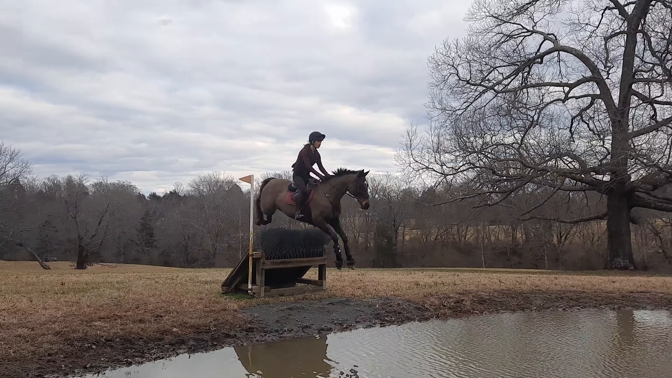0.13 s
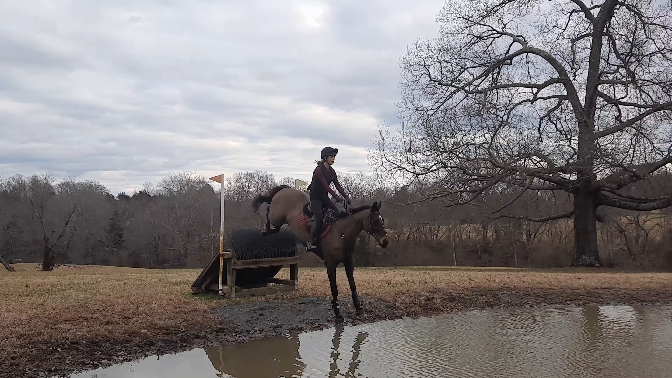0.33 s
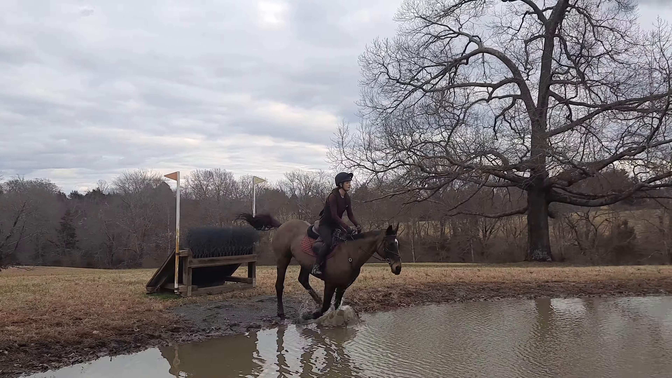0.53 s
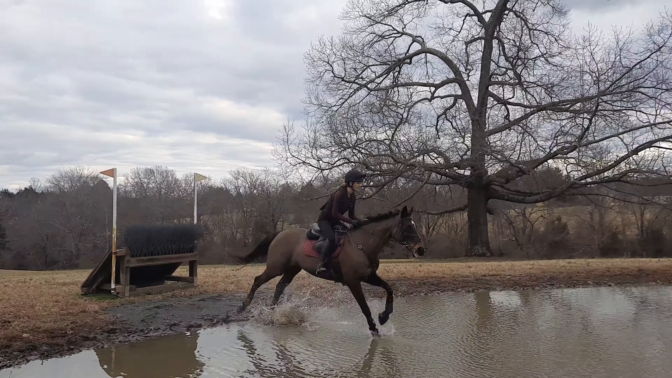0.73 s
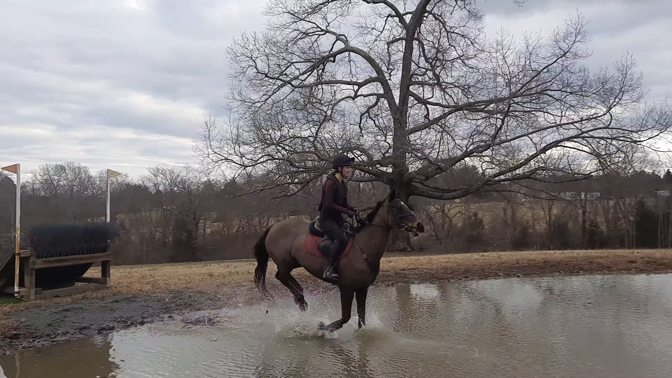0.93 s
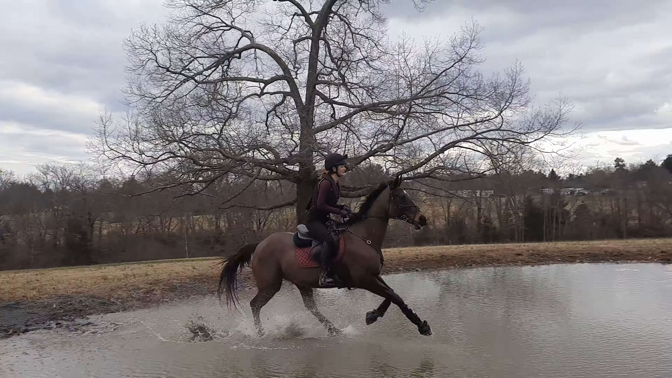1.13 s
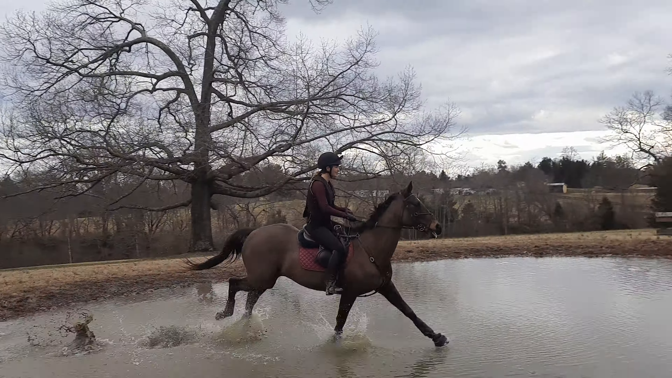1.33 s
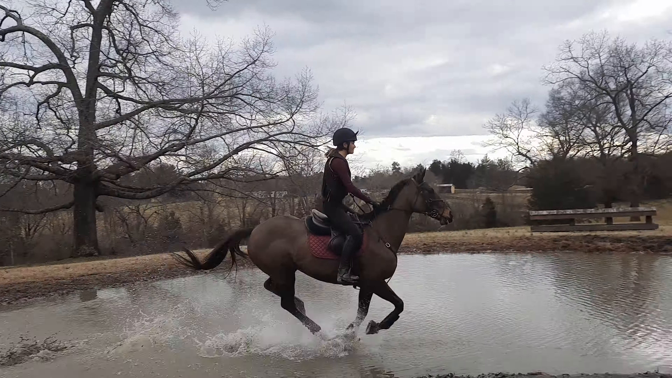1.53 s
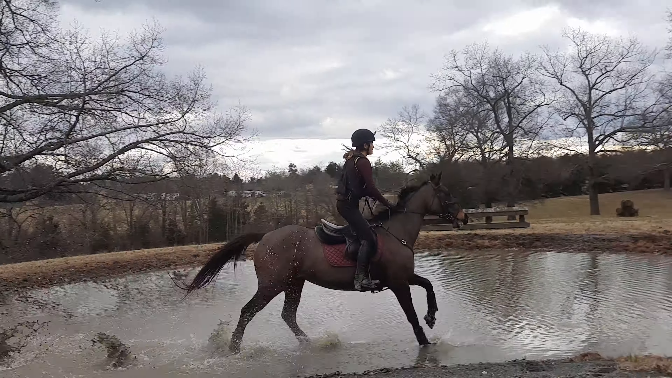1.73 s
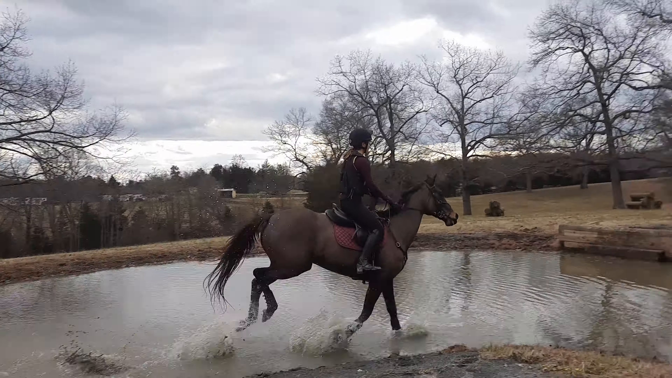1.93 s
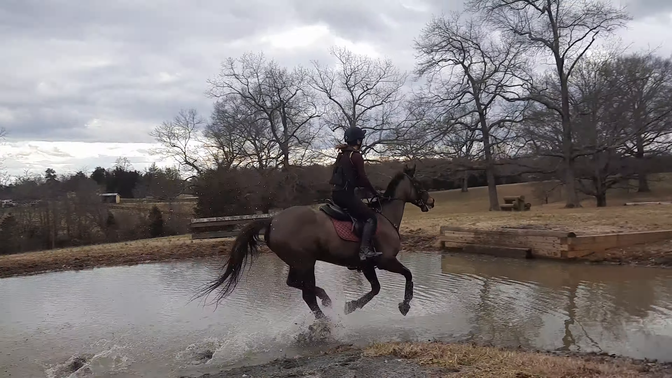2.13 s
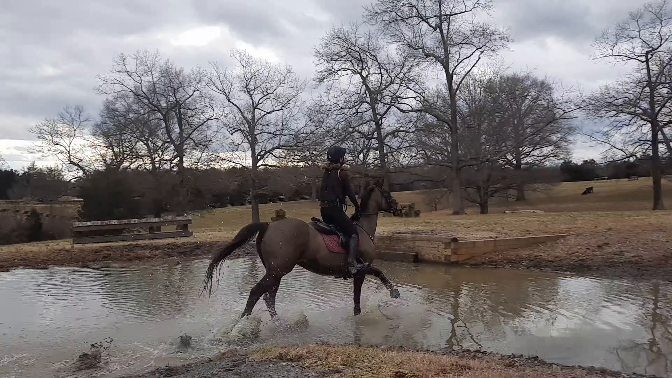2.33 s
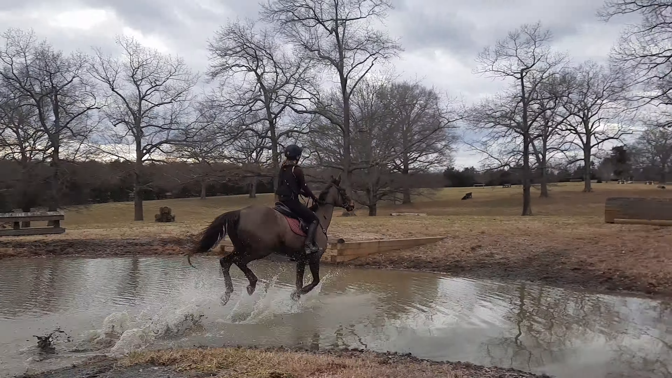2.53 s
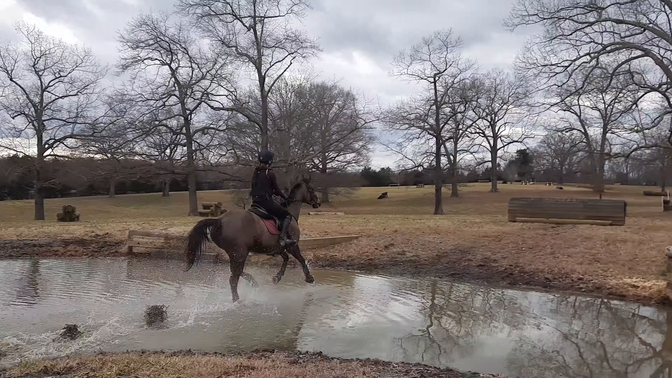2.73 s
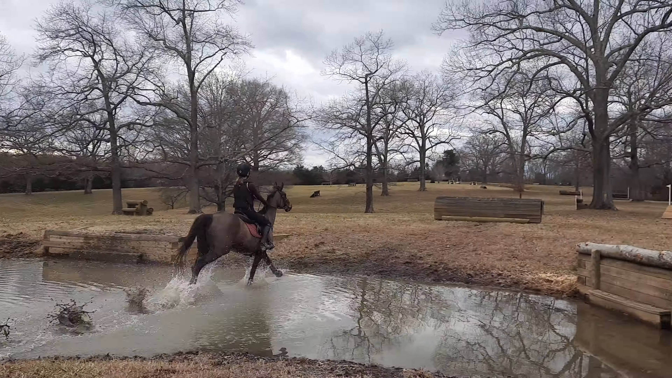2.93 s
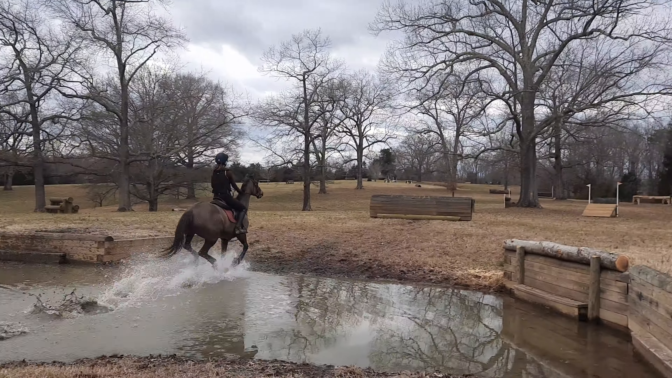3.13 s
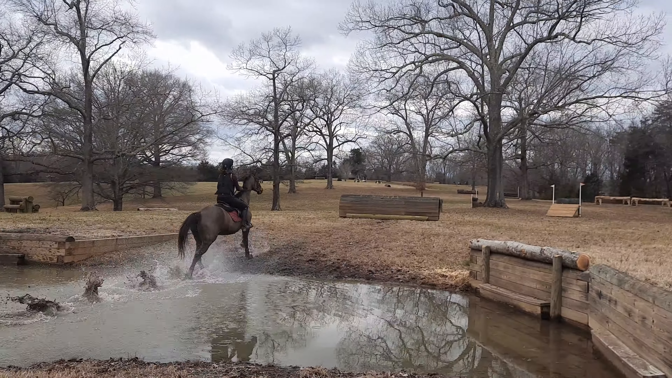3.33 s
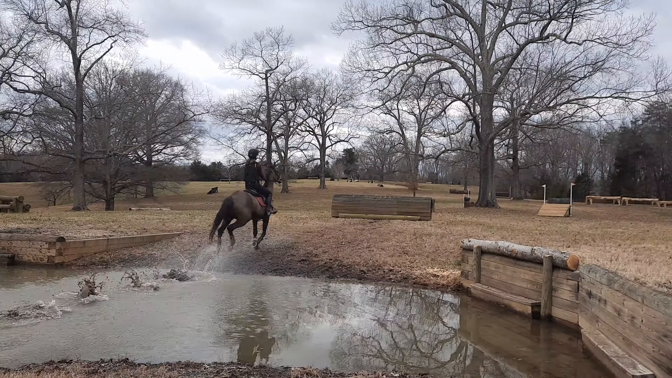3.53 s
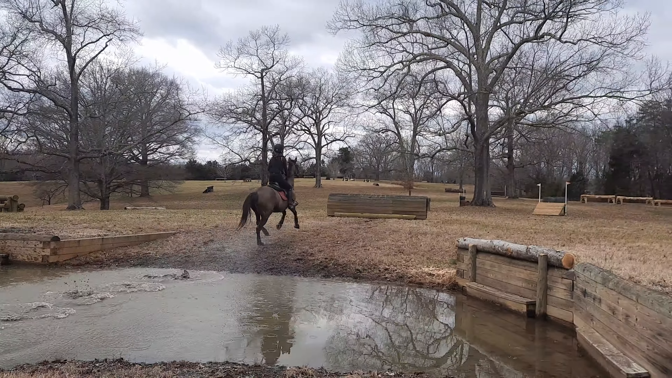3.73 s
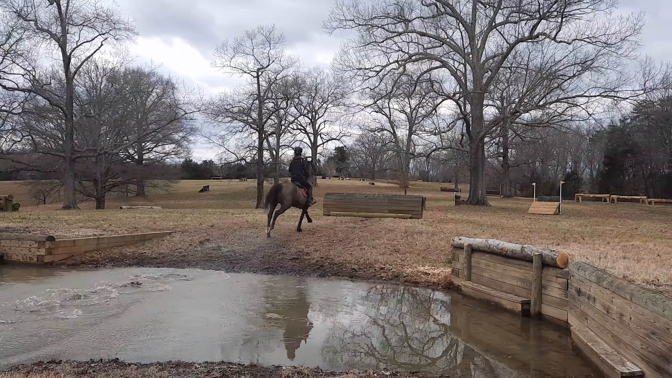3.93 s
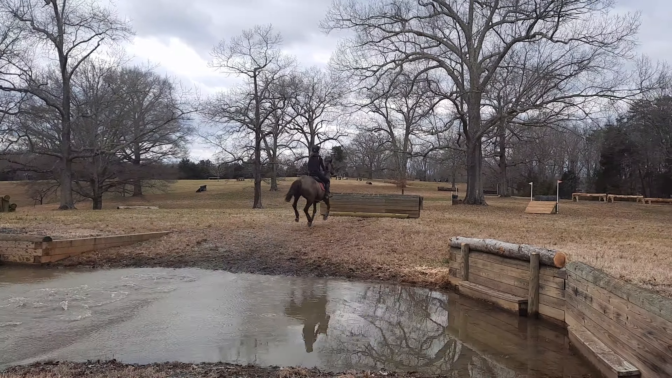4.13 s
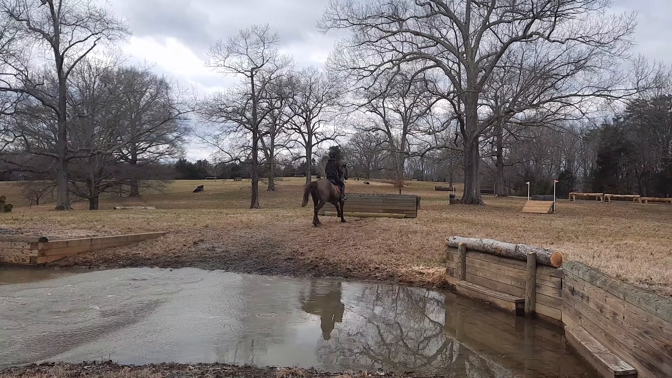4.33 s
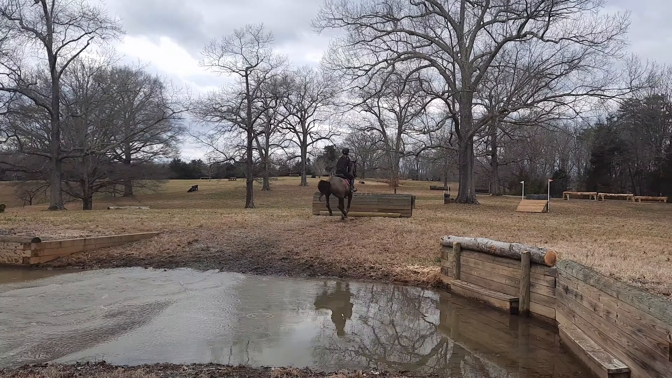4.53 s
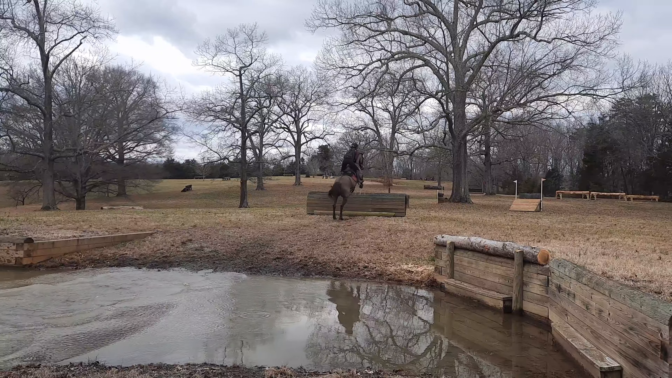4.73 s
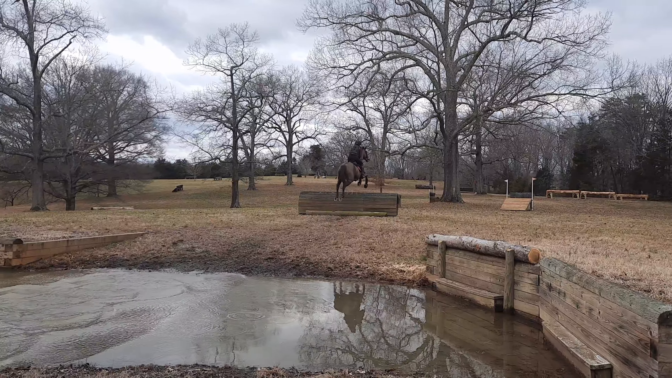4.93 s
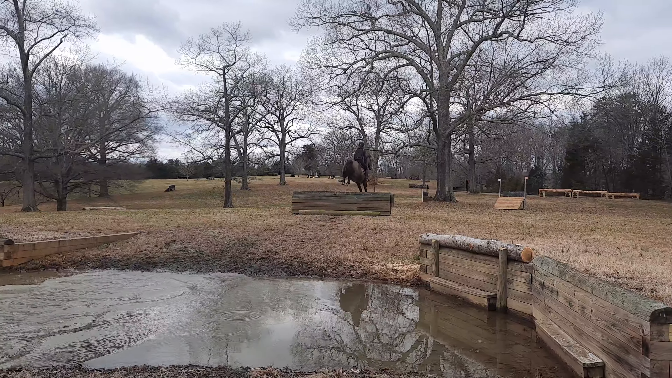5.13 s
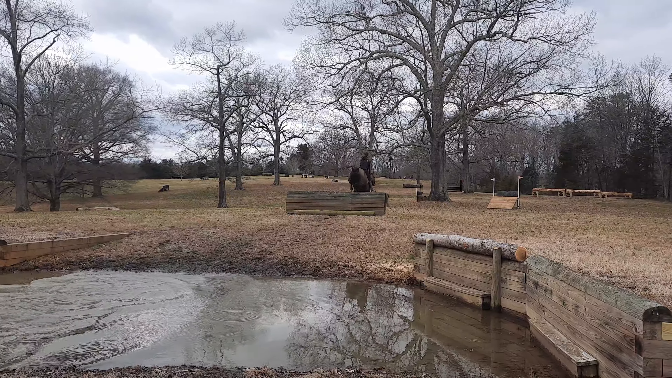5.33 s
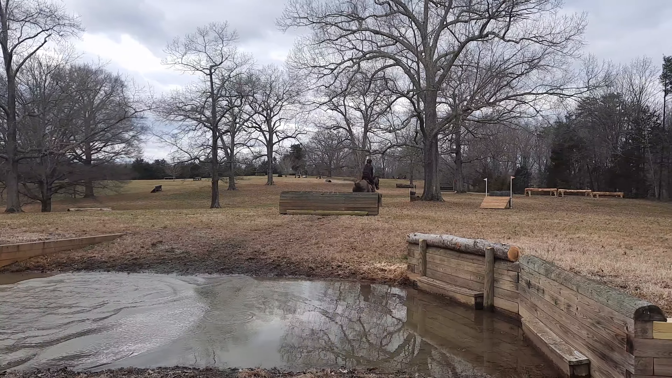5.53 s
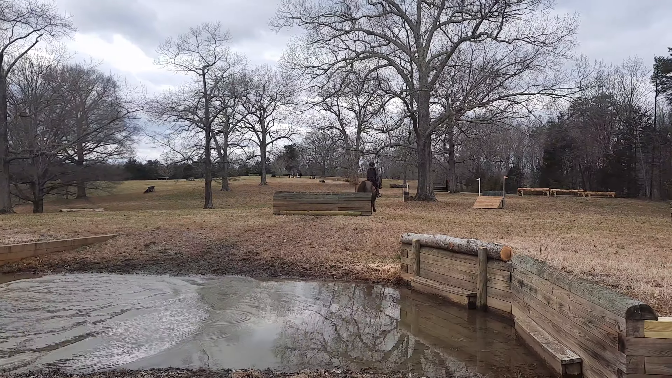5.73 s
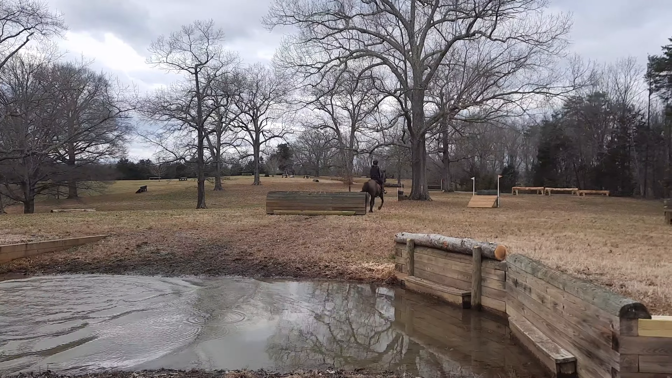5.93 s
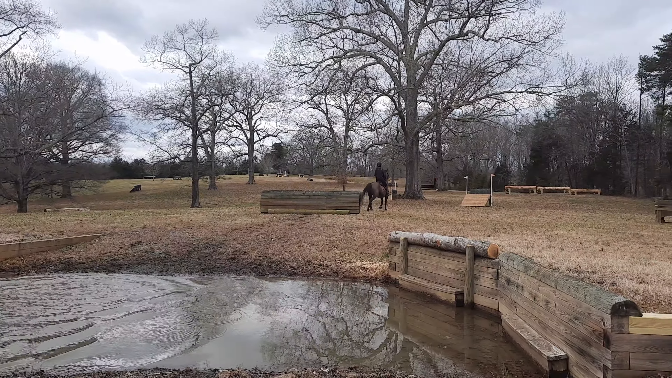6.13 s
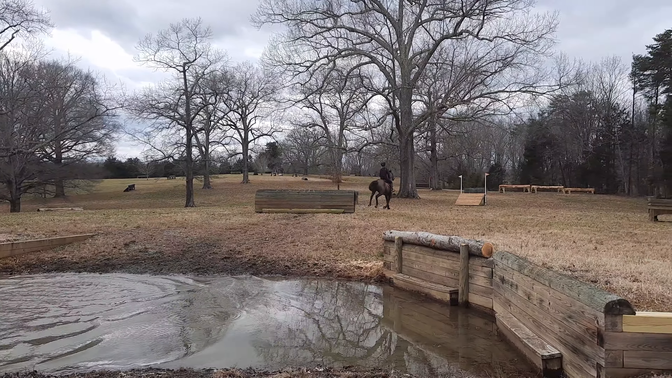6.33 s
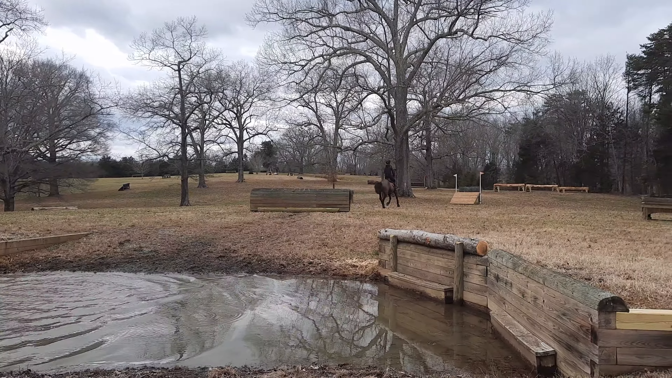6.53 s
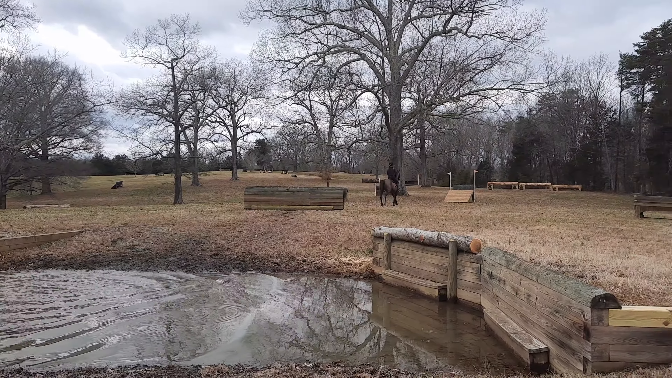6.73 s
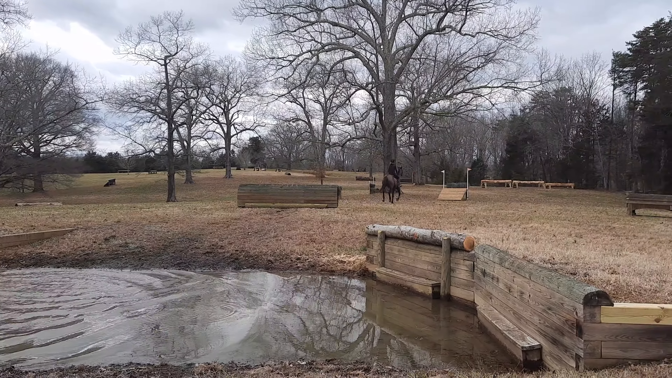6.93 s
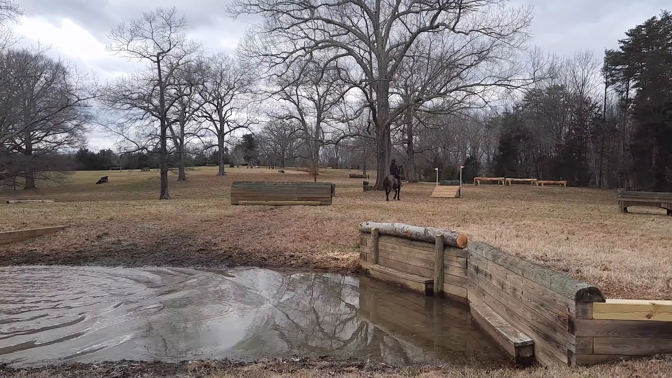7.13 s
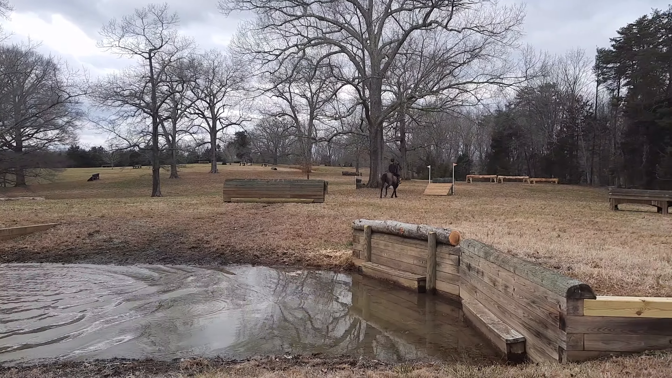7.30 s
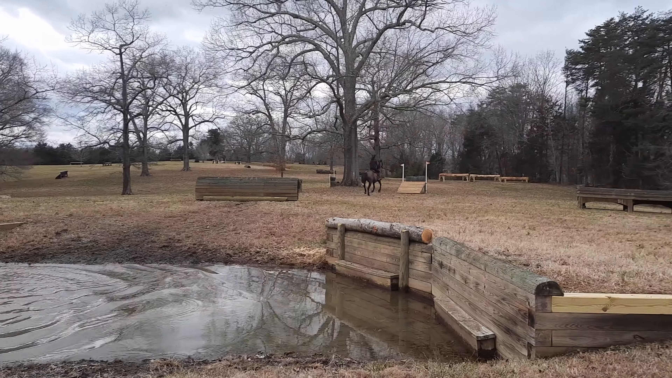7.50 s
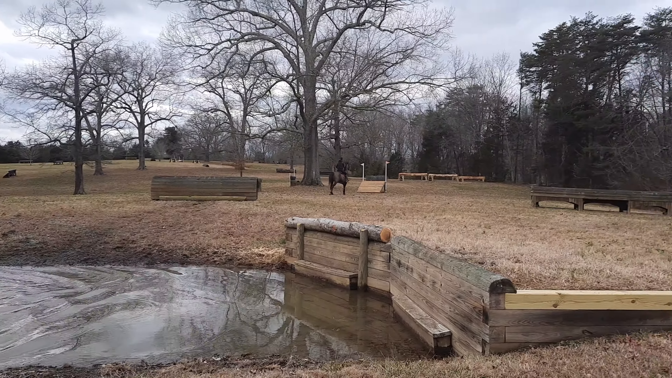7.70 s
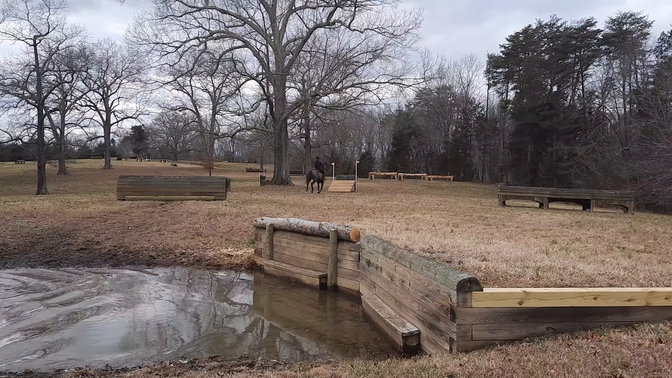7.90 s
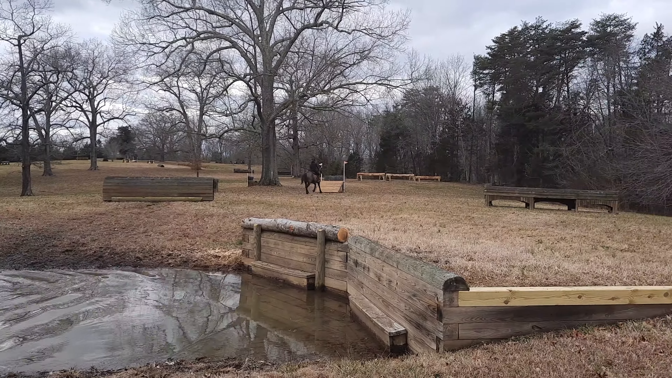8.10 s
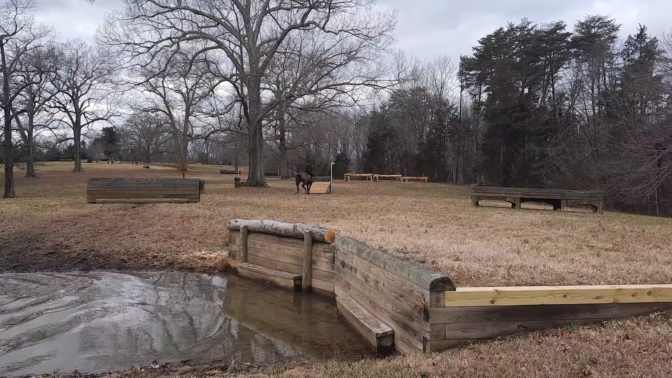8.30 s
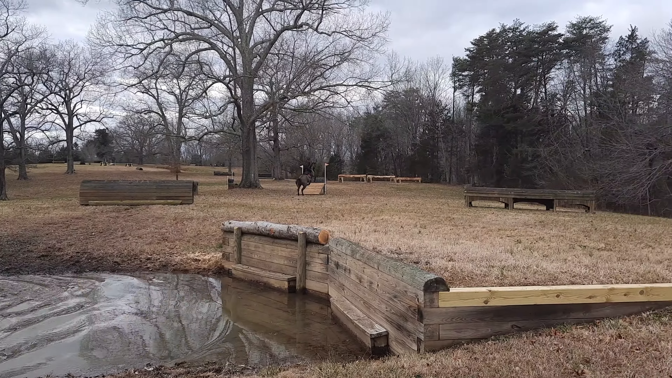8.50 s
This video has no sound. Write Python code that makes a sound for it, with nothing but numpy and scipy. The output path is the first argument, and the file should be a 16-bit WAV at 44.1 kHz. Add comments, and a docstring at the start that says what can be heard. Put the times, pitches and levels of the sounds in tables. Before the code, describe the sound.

A horse plunges into a shallow pond and canters through with heavy slaps and hissing spray, then thuds away over turf into windy quiet.

```python
"""Heavy plunges, sharp slaps and hissing spray: a horse canters through a shallow pond past the microphone.
Each hoof drives an air pocket under (sinking sine swings), slaps the surface and throws up a sheet of water
(shaped noise) that falls back as drops and bubbles (impact trains, short rising sines).
Ashore, dull thuds and grit draw away over turf, with a last cluster at a far fence.
Behind: scuffs, rustling cloth, a far bird, still air and a breeze buffeting the two microphone ports."""
import sys
import numpy as np
from scipy import signal
from scipy.fft import rfft, irfft, next_fast_len
from scipy.io import wavfile
from scipy.ndimage import uniform_filter1d, map_coordinates

SR = 44100
rng = np.random.default_rng(int(sys.argv[2]) if len(sys.argv) > 2 else 0)


def bounce(signal):
    """Save signal as a 16-bit WAV file at the path given by the first command-line argument."""
    frames = np.transpose(np.atleast_2d(signal))
    limited = np.clip(frames, -1, 1)
    pcm = np.round(limited * 32767).astype(np.int16)
    wavfile.write(sys.argv[1], SR, pcm)


N = 381906
TIME = np.arange(N) / SR


def gain_of(db):
    """Decibels to amplitude."""
    return 10 ** (np.asarray(db) / 20)


def evened(x):
    """Scales to rms 1."""
    return x / np.sqrt(np.mean(x ** 2) + 1e-20)


def white():
    """Three unrelated white noises, the input of ports()."""
    return rng.standard_normal((3, N))


def filtered(x, order, edge_hz, kind="low"):
    """Butterworth filter."""
    return signal.sosfilt(signal.butter(order, edge_hz, kind, fs=SR, output="sos"), x)


def read_spectrum(points, hz):
    """Interpolates a table on a log-frequency axis."""
    f, value = np.transpose(points)
    return np.interp(np.log(hz + 1), np.log(f + 1), value)


def add(mix, start_s, sound):
    """Mixes a sound in at its start time."""
    part = mix[max(round(start_s * SR), 0):][:len(sound)]
    part += sound[:len(part)]


def swell(t, rise_s):
    """Grows to 1 in the rise time, then dies away."""
    u = np.maximum(t, 0) / rise_s
    return u * np.exp(1 - u)


def swell_time(rise_s):
    """Time axis long enough for one swell."""
    return np.arange(0, 10 * rise_s, 1 / SR)


def sagging_swing(t, hz, rise_s, sag):
    """A swelling sine that sinks in pitch from hz * (1 + sag) towards hz * (1 - sag)."""
    pitch_hz = hz * (1 + sag * (2 * np.exp(-t / (2 * rise_s)) - 1))
    turns = np.cumsum(pitch_hz) / SR
    return swell(t, rise_s) * np.sin(2 * np.pi * turns)


def bursts(rows):
    """Power sum of swells given as (time [s], level [dB], rise [s])."""
    power = np.zeros(N)
    for s, db, rise_s in rows:
        add(power, s, (gain_of(db) * swell(swell_time(rise_s), rise_s)) ** 2)
    return np.sqrt(power)


def ports(three, spectrum, likeness):
    """Colours three unrelated signals: one shared by both ports, one private to each."""
    size = next_fast_len(N)
    z, hz = rfft(three, size), np.fft.rfftfreq(size, 1 / SR)
    same = np.clip(read_spectrum(likeness, hz), 0, 1)
    pair = np.sqrt(same) * z[0] + np.sqrt(1 - same) * z[1:]
    coloured = pair * gain_of(read_spectrum(spectrum, hz))
    return evened(irfft(coloured, size)[:, :N])


def patter(per_s, spread_db, smooth):
    """Three trains of tiny impacts of uneven size over a blur of still finer ones."""
    size = gain_of(spread_db * np.minimum(rng.exponential(1, (3, N)), 4))
    sign = np.sign(rng.standard_normal((3, N)))
    struck = rng.random((3, N)) < per_s / SR
    return evened(size * sign * struck) + smooth * white()


def lumpy(x, span_s, span_hz, depth_db):
    """Breaks a wash into clumps that come and go, each in its own band."""
    _, _, z = signal.stft(x, nperseg=512, noverlap=384)
    field = rng.standard_normal(z.shape[1:])
    spans = [span_hz * 512 / SR, span_s * SR / 128]  # in bins, in frames
    reach = np.arange(-40, 41)
    for axis, span in enumerate(spans):
        bell = np.exp(-.5 * (reach / span) ** 2)
        field = signal.fftconvolve(field, np.expand_dims(bell, 1 - axis), "same", axes=axis)
    clumps = gain_of(depth_db * np.clip(evened(field), -2, 2))
    return evened(signal.istft(z * clumps, nperseg=512, noverlap=384)[1][:, :N])


def puff(noise, db, rise_s):
    """Cuts one swell of the given level from the start of a noise."""
    shape = swell(swell_time(rise_s), rise_s)[:noise.shape[-1]]
    rms = np.sqrt(np.mean(shape ** 2))
    return gain_of(db) * rms * evened(noise[..., :len(shape)] * shape)


def puffs(pair, rows):
    """Swells of a two-port noise at (time [s], level [dB], rise [s])."""
    out = np.zeros((2, N))
    for s, db, rise_s in rows:
        cut = puff(pair[:, round(s * SR):], db, rise_s)
        for port, sound in zip(out, cut):
            add(port, s, sound)
    return out


def spatter(rows, octaves, per_s, smooth):
    """Short clusters of sharp impacts at (time [s], level [dB], centre [Hz], rise [s])."""
    out, hits = np.zeros(N + SR), patter(per_s, spread_db=2, smooth=smooth)[0]
    for s, db, hz, rise_s in rows:
        edges_hz = np.minimum(hz * 2 ** (np.array([-.5, .5]) * octaves), .48 * SR)
        band = filtered(hits[round(s * SR):][:SR // 2], 2, edges_hz, "band")
        add(out, s, puff(band, db, rise_s))
    return out[:N]


# breeze before its trim: (time [s], level [dB])
BREEZE_LEVELS = [(5.6, -59), (6.298, -42.5), (6.398, -46.5), (6.7, -37), (6.75, -44), (6.792, -37.5),
                 (6.818, -53), (7.01, -43), (7.166, -48.5), (7.24, -61)]
# single gusts: (time [s], length [s], level [dB])
GUST_EVENTS = [(7.259, 0.15, -50), (7.51, 0.21, -54), (7.79, 0.14, -52.5), (7.989, 0.046, -63),
               (8.074, 0.03, -70), (8.154, 0.12, -61), (8.556, 0.11, -45)]
# air past the ports as the microphone swings round: (time [s], level [dB])
SWING_LEVELS = [(.4, -76), (1.5, -62), (3.2, -44.5), (3.7, -62), (4.6, -61), (5.05, -53.5), (5.3, -67.5),
                (5.9, -81)]
# relative spectra of buffeting and still air: (frequency [Hz], level [dB])
BUFFET_SPECTRUM = [(20, -17.5), (50, -1), (80, 4.5), (130, -7.5), (250, -20.5), (400, -35), (1000, -50.5),
                   (4000, -78)]
AIR_SPECTRUM = [(15, -33.5), (25, -9.5), (80, -5), (111, -7), (206, -13), (384, -13.5), (754, -7.5),
                (988, -15), (1440, -23), (2050, -16.5), (3160, -29.5), (8140, -28), (9320, -36),
                (11000, -29.5), (16000, -31.5)]
# likeness of the two ports in air noise: (frequency [Hz], shared power [0-1])
AIR_LIKENESS = [(30, 0.046), (90, 0.17), (250, 0.51), (800, 0.12), (2000, 0.11), (5000, 0.067)]
CALM_DB, AIR_DB = -87.5, -68.5  # calm: outside the breeze table, before the trim


def outdoors(lean_db=2, flutter_db=4.5, breeze_trim_db=-1):
    """Still country air, and gusts that flutter in the ports, more in the windward left one."""
    breeze_db = np.interp(TIME, *np.transpose(BREEZE_LEVELS), left=CALM_DB, right=CALM_DB)
    gust = gain_of(breeze_db + breeze_trim_db)
    for s, length_s, db in GUST_EVENTS:
        add(gust, s, gain_of(db) * np.sin(np.pi * np.arange(0, length_s, 1 / SR) / length_s))
    swing = gain_of(np.interp(TIME, *np.transpose(SWING_LEVELS)))
    gust = gust * gain_of([[lean_db], [-lean_db]]) + swing
    eddies = filtered(rng.standard_normal(N), 2, [4, 16], "band")
    flutter = gain_of(flutter_db * np.tanh(evened(eddies)))
    rumble = gust * flutter * ports(white(), BUFFET_SPECTRUM, AIR_LIKENESS)
    air = lumpy(ports(white(), AIR_SPECTRUM, AIR_LIKENESS), span_s=.03, span_hz=400, depth_db=2)
    return rumble + gain_of(AIR_DB) * air


# whistles: (time [s], rise [s], pitch [Hz], glide [Hz/s], level [dB])
BIRD_CALLS = [(5.15, 0.047, 3650, -300, -82), (5.255, 0.042, 3520, 700, -75),
              (5.473, .022, 3220, -900, -73)]


def bird(blur_hz=150):
    """Thin, far whistles: swelling sines that slide in pitch, blurred by random pitch jitter."""
    out = np.zeros(N)
    for s, rise_s, hz, glide, db in BIRD_CALLS:
        t = swell_time(rise_s)
        waver = evened(uniform_filter1d(rng.standard_normal(len(t)), size=40))
        turns = np.cumsum(hz + glide * t + blur_hz * waver) / SR
        add(out, s, gain_of(db) * swell(t, rise_s) * np.sin(2 * np.pi * turns))
    return out


# clicks and scuffs: (time [s], level [dB], centre [Hz], rise [s])
SCUFF_EVENTS = [(0, -59, 890, 0.0062), (.254, -61, 2140, 0.0064), (0.429, -41, 1810, 0.0015),
                (3.641, -37, 760, 0.0019), (3.9407, -35, 720, 0.0017), (4.148, -41, 1500, 0.0028),
                (4.341, -48, 1050, 0.0017), (4.435, -53, 1100, 0.0044), (4.523, -57, 1400, 0.0044),
                (4.61, -67, 1200, .003), (4.652, -44.5, 1350, 0.0014), (4.946, -52, 750, 0.005),
                (4.94, -66.5, 2560, 0.011), (5.361, -65, 1620, 0.0037), (5.402, -59, 920, 0.0031),
                (5.428, -60.5, 1160, 0.0069), (5.44, -58.5, 270, 0.039), (5.51, -55, 1050, 0.0016),
                (5.653, -61.5, 2065, 0.0029), (5.803, -58, 1080, 0.0093), (5.81, -66, 1990, 0.029),
                (5.842, -54.5, 1085, 0.0044), (5.86, -64, 1130, 0.014), (5.975, -61.5, 2000, 0.0043),
                (6.17, -74, 2050, 0.076), (6.82, -72, 1930, 0.08), (7.14, -82, 2120, 0.086),
                (7.162, -55.5, 830, 0.0026), (7.835, -75, 753, 0.0069), (7.838, -59.5, 231, 0.0073),
                (8.406, -70.5, 1406, 0.0023), (8.561, -57.5, 620, 0.0072), (8.564, -49, 198, 0.003)]
# cloth beside the microphone: (time [s], level [dB], rise [s])
CLOTH_RUSTLES = [(0, -56, 0.029), (0.22, -62.5, 0.037), (5.03, -70, .03), (5.34, -70, .025),
                 (5.96, -65, 0.031), (6.085, -60.5, 0.028), (6.2, -67.5, 0.035), (6.43, -71, 0.026),
                 (6.74, -67, 0.023), (6.91, -70.5, 0.046), (7.163, -63, 0.0042), (7.18, -61.5, 0.017),
                 (7.26, -66.5, 0.025), (7.34, -70, .01), (8.15, -76, 0.023), (8.56, -64.5, 0.017)]
# dry ticks beside the microphone: (time [s], level [dB], centre [Hz], rise [s])
TICK_EVENTS = [(.256, -50.5, 1870, 0.0013), (5.073, -64, 7400, 0.00069), (6.11, -62, 2980, 0.00047),
               (6.645, -71, 3040, .0015), (6.675, -68, 2600, 0.0013), (6.921, -66, 11050, .0006),
               (7.048, -69, 3500, 0.00093), (7.166, -63, 3500, 0.00076), (8.308, -66, 746, .003),
               (8.408, -73.5, 4520, 0.0019)]
SCUFF_HISS_DB, TICK_OCTAVES = -12.5, 0.56  # hiss relative to its scuff; tick bandwidth


def scuffs(width=0.42):
    """Grainy rubs and clicks, each a broad resonance with some hiss, over ticking, rustling cloth."""
    out, grains = np.zeros(N), patter(per_s=700, spread_db=2, smooth=.35)[0]
    for s, db, hz, rise_s in SCUFF_EVENTS:
        edges_hz = [hz / (1 + width / 2), hz * (1 + width / 2)]
        band = filtered(grains[round(s * SR):][:SR], 3, edges_hz, "band")
        add(out, s, puff(band, db, rise_s))
    cloth = [(300, 4), (900, 6.5), (1400, 1.0), (2100, 8.0), (2600, -1.5), (3600, -6.5), (5500, 0),
             (8000, 1.0), (9500, -11.5), (12000, 0.0), (16000, -10.0)]  # (Hz, dB)
    hiss = ports(patter(per_s=500, spread_db=3.5, smooth=.45), cloth, AIR_LIKENESS)
    hiss = lumpy(hiss, span_s=.012, span_hz=350, depth_db=4)
    out += spatter(TICK_EVENTS, TICK_OCTAVES, per_s=5600, smooth=0.44)
    scuff_hiss = [(s, db + SCUFF_HISS_DB, rise_s) for s, db, _, rise_s in SCUFF_EVENTS]
    return out + hiss * bursts(list(CLOTH_RUSTLES) + scuff_hiss)


# hoofs on turf: (time [s], peak level [dB], pitch [Hz])
TURF_THUDS = [(3.892, -30, 227), (3.94, -33, 306), (3.948, -35.5, 133), (4.104, -30.5, 267),
              (4.115, -40.5, 134), (4.137, -45, 100), (4.326, -36.5, 124), (4.427, -38.5, 124),
              (4.446, -35.5, 140), (4.711, -45, 239), (4.723, -35.5, 117.7), (4.741, -43, 95),
              (4.842, -52, 84), (4.954, -43, 78.4), (5.403, -51, 167), (5.432, -38, 292),
              (5.438, -37.5, 172), (5.455, -42.5, 88.7), (5.485, -33, 165.6), (5.55, -54, 210),
              (5.585, -56, 200)]
# clods and grit under the hoofs: (time [s], level [dB], centre [Hz], rise [s])
CLOD_CRUNCHES = [(3.892, -35, 450, 0.0034), (3.942, -34.5, 1500, 0.0018), (3.95, -37.5, 404, 0.0046),
                 (4.015, -42, 1200, 0.0023), (4.112, -48, 352, 0.0044), (4.225, -52, 1500, .002),
                 (4.269, -46, 1900, .002), (4.31, -48, 2100, .003), (4.333, -55, 420, 0.0064),
                 (4.452, -56, 550, 0.0037), (4.473, -49, 1700, .0012), (4.523, -54, 517, 0.0065),
                 (4.611, -55, 550, 0.0027), (4.633, -56, 1300, .006), (4.653, -47, 2400, .0012),
                 (4.664, -52, 2400, 0.0026), (4.694, -63, 2300, .003), (4.713, -56, 500, .006),
                 (4.806, -65.5, 1000, .002), (4.893, -67, 600, 0.0048), (4.937, -58, 857, .004),
                 (4.988, -66, 2110, 0.0044), (5.484, -64, 1200, 0.0045), (5.6, -65, 1004, .006)]
# likeness of the two ports for water and grit: (frequency [Hz], shared power [0-1])
WATER_LIKENESS = [(30, 0.4), (120, 1), (400, 1), (800, 0.98), (1400, 0.7), (2500, 0.2), (4500, 0.5),
                  (9000, 0), (16000, 0.11)]
THUD_CYCLES, CLOD_OCTAVES = 0.97, 1.02  # pitch cycles to the peak; bandwidth
BANK_S, GRIT_FADE_DB_PER_S = 3.89, 16  # grit equals the thud level here, then fades with distance


def turf(sag=0.023):
    """The ground gives a dull swing under each hoof, sinking in pitch, and grit is kicked up."""
    out, t, kicks = np.zeros(N), np.arange(0, .12, 1 / SR), []
    for s, db, hz in TURF_THUDS:
        rise_s = THUD_CYCLES / hz
        add(out, s, gain_of(db) * sagging_swing(t, hz, rise_s, sag))
        kicks.append((s, db - GRIT_FADE_DB_PER_S * (s - BANK_S), rise_s))
    soil = [(40, 8), (100, 16.5), (250, 5), (550, -5.5), (1200, -7.0), (2200, -4.0),
            (3200, -19), (16000, -24)]  # (Hz, dB)
    grit = ports(patter(per_s=1100, spread_db=3.5, smooth=0.79), soil, WATER_LIKENESS)
    clods = spatter(CLOD_CRUNCHES, CLOD_OCTAVES, per_s=380, smooth=0.4)
    return out + puffs(grit, kicks) + clods


def bubbles(low_hz, high_hz, cycles, glide, spread_db, count):
    """Bubbles of all sizes ring briefly, rising in pitch as they near the surface."""
    out = np.zeros((2, N))
    for when, size, life, loud, side in rng.random((count, 5)):
        hz = low_hz * (high_hz / low_hz) ** size
        decay_s = cycles * (.5 + life) / hz
        u = np.arange(0, 5 * decay_s, 1 / SR) / decay_s
        envelope = np.exp(-u) * (1 - np.exp(-10 * u))
        ring = np.sin(2 * np.pi * hz * decay_s * u * (1 + glide * u)) * envelope
        ring *= gain_of(-spread_db * np.log(max(loud, .05)))
        add(out[0], when * N / SR, ring * (2.15 + side))
        add(out[1], when * N / SR, ring * (2.85 - side))
    return evened(out)


ENTER_S, STIRRED_S, ASHORE_S, BUILD_DB = .45, .9, 3.408, 21
STRIDE_S, SURGE_S, SETTLE_S = 0.5376, 1.08, 0.055  # surge period, one surge peak, surge decay ashore


def fallback(level_db, surge_db, fade_db_per_s):
    """Level of the water falling back: build-up, one surge a stride, then a steady fade ashore."""
    ashore_s = np.maximum(TIME - ASHORE_S, 0)
    build_db = BUILD_DB * np.minimum((TIME - STIRRED_S) / (STIRRED_S - ENTER_S), 0)
    surge = surge_db * np.cos(2 * np.pi * (TIME - SURGE_S) / STRIDE_S) * np.exp(-ashore_s / SETTLE_S)
    return (TIME > ENTER_S) * gain_of(level_db + build_db + surge - fade_db_per_s * ashore_s)


ENTRY_LEAD_S, ENTRY_RISE_S = 0.0027, .006  # the surface breaks just before the hoof is under
SHEET_DELAY_S, SHEET_RISE_S = 0.017, .011


def thrown(strikes, sheet_db):
    """Level of the splashes of hoofs at (time [s], level [dB]): the entry, then the rising sheet."""
    entry = bursts([(s - ENTRY_LEAD_S, db, ENTRY_RISE_S) for s, db in strikes])
    sheet = bursts([(s + SHEET_DELAY_S, db + sheet_db, SHEET_RISE_S) for s, db in strikes])
    return np.hypot(entry, sheet)


def clots(x, span_s, depth_db):
    """Water lands in clots with gaps between them, across the whole spectrum at once."""
    field = signal.fftconvolve(rng.standard_normal(N), np.hanning(int(span_s * SR)), "same")
    return evened(x * gain_of(depth_db * np.clip(evened(field), -2, 1.5)))


TURN_S, TURN_LENGTH_S, DULL_HZ = 2.84, 1, 1730


def receding(x):
    """The churning dulls as the horse turns away: a crossfade to a gentle lowpass."""
    far = np.clip((TIME - TURN_S) / TURN_LENGTH_S, 0, 1)
    return (1 - far) * x + far * filtered(x, 1, DULL_HZ)


# hoof strikes on water: (time [s], air pocket peak [dB], pocket pitch [Hz], cycles to its peak,
# slap [dB, before shock and crack offsets], churn [dB], spray [dB])
HOOF_PLUNGES = [(0.462, -4, 1086, 0.77, -14.5, -22.5, -37), (0.6179, -10, 346, 0.32, -25, -30, -30.5),
                (0.781, -14.5, 623, 0.52, -35, -26.5, -47), (0.804, -9, 700, 0.27, -15, -28.5, -29),
                (0.8103, -11, 654, 0.69, -23, -40.5, -37), (0.9196, -11.5, 473, 0.7, -17.5, -25, -29.5),
                (1.0908, -17, 1040, 0.55, -22, -27.5, -41), (1.2184, -10, 350, 0.39, -15.5, -28, -34),
                (1.291, -18, 420, 0.92, -22, -24, -29.5), (1.3656, -17, 467, 0.4, -40, -36.5, -47.5),
                (1.4345, -9.5, 467, 0.72, -17, -26, -27), (1.7671, -19.5, 460, 0.71, -26, -26, -28.5),
                (1.798, -14.5, 437, 0.43, -18, -25, -33), (1.9626, -8, 415, 0.36, -33, -27, -29),
                (1.9928, -18, 472, 0.99, -40.5, -40, -32.5), (2.3322, -14, 383, 0.47, -23.5, -24, -31),
                (2.5003, -15.5, 503, 0.29, -41.5, -30.5, -31), (2.7638, -15, 196, 0.36, -33, -27.5, -36),
                (2.873, -15, 253, 0.49, -20.5, -28.5, -39), (2.899, -16.5, 320, 0.93, -35, -32, -36),
                (2.9949, -25, 557, 0.53, -32, -47, -48), (3.049, -15, 434, 0.39, -26, -29, -32.5),
                (3.102, -15.5, 161, 0.84, -16.5, -24, -40.5), (3.2824, -13, 272, 0.4, -28.5, -31, -61),
                (3.296, -19.5, 659, 2.3, -53, -29, -56), (3.3804, -13, 270, 0.46, -22.5, -24, -44),
                (3.3914, -19, 264, 0.53, -24.5, -53, -62), (3.426, -22.5, 430, 0.94, -44, -31, -60),
                (3.5651, -26.5, 169, 0.52, -32, -34, -46)]
# legs sweeping through water: (time [s], churn [dB], spray [dB], rise [s])
LEG_SWEEPS = [(0.428, -32.5, -40, 0.0096), (0.591, -32, -33.5, 0.023), (0.649, -30, -38.5, 0.022),
              (.757, -37, -43, .014), (0.99, -28.5, -34.5, 0.0088), (1.025, -42, -37.5, 0.019),
              (1.118, -26.5, -37.5, 0.0057), (1.51, -36.5, -32, 0.019), (1.551, -29, -22, 0.019),
              (1.609, -27.5, -33.5, 0.022), (1.751, -28, -31.5, 0.014), (2.075, -42.5, -26.5, .016),
              (2.247, -29.5, -40, 0.0069), (2.522, -31, -30.5, 0.014), (2.629, -46, -29.5, 0.015),
              (3.068, -30.5, -34, .015), (3.172, -27.5, -31, 0.018), (3.24, -32, -47, 0.014)]
# relative spectrum of the churn: (frequency [Hz], level [dB])
CHURN_SPECTRUM = [(25, -46), (80, -22), (200, -3.5), (400, -3), (700, -3.5), (1100, -3), (1600, -4),
                  (2200, -4.5), (2900, -19.5), (3700, -18.5), (5000, -21.5), (16000, -52.5)]
# water falling back as churn: (level [dB], surge [dB], fade [dB/s])
CHURN_FALLBACK = (-35.5, 1.5, 21.6)
SHEET_CHURN_DB, BUBBLE_FADE_DB_PER_S = -5.5, 17  # sheet relative to entry; extra fade ashore


def churn():
    """Thrown sheets and falling water churn the pond: clumped impacts and ringing bubbles."""
    level = np.linalg.norm([fallback(*CHURN_FALLBACK),
                            thrown([(s, db) for s, *_, db, _ in HOOF_PLUNGES], SHEET_CHURN_DB),
                            bursts([(s, db, rise_s) for s, db, _, rise_s in LEG_SWEEPS])], axis=0)
    foam = ports(patter(per_s=1500, spread_db=1.5, smooth=0.49), CHURN_SPECTRUM, WATER_LIKENESS)
    foam = gain_of(-3) * lumpy(foam, span_s=.0055, span_hz=150, depth_db=4.4)
    sparse = ports(patter(per_s=330, spread_db=2.5, smooth=0), CHURN_SPECTRUM, WATER_LIKENESS)
    foam = clots(foam + gain_of(-6.5) * sparse, span_s=.016, depth_db=2.0)
    fizz = gain_of(-4 - BUBBLE_FADE_DB_PER_S * np.maximum(TIME - ASHORE_S, 0))
    foam += fizz * bubbles(low_hz=380, high_hz=2500, cycles=4.5, glide=.015, spread_db=4.2, count=2400)
    return level * receding(foam)


# relative spectrum of the spray: (frequency [Hz], level [dB])
SPRAY_SPECTRUM = [(800, -22.5), (2500, 3.5), (3700, -0.5), (4900, -3), (6300, 1.5), (8300, 0), (9200, -8.5),
                  (10200, -7), (11500, -1), (13500, -0.5), (16000, -3.5)]
# water falling back as spray: (level [dB], surge [dB], fade [dB/s])
SPRAY_FALLBACK = (-37, 2.1, 23.4)
SHEET_SPRAY_DB = -2.5  # relative to entry


def spray():
    """Fine drops hiss as dense, clumped impacts with tiny bubbles."""
    level = np.linalg.norm([fallback(*SPRAY_FALLBACK),
                            thrown([(s, db) for s, *_, db in HOOF_PLUNGES], SHEET_SPRAY_DB),
                            bursts([(s, db, rise_s) for s, _, db, rise_s in LEG_SWEEPS])], axis=0)
    drops = ports(patter(per_s=2200, spread_db=0.5, smooth=0.21), SPRAY_SPECTRUM, WATER_LIKENESS)
    drops = lumpy(drops, span_s=.007, span_hz=380, depth_db=2.8)
    drops = clots(drops, span_s=.012, depth_db=1.2)
    tiny = bubbles(low_hz=2400, high_hz=9000, cycles=5, glide=.006, spread_db=4, count=3000)
    return level * (drops + gain_of(-15) * tiny)


# relative spectrum of the slosh: (frequency [Hz], level [dB])
SLOSH_SPECTRUM = [(20, -30), (50, -15), (100, 0), (160, 2.5), (260, -1), (450, -2), (1200, -43.5)]
# water falling back as slosh: (level [dB], surge [dB], fade [dB/s])
SLOSH_FALLBACK = (-48, 17, 82)
HOLE_RISE_S, HOLE_DB = .014, -21  # level relative to the air pocket


def slosh():
    """The holes in the water slosh: low noise and large, low bubbles."""
    holes = bursts([(s, db + HOLE_DB, HOLE_RISE_S) for s, db, *_ in HOOF_PLUNGES])
    level = np.hypot(fallback(*SLOSH_FALLBACK), holes)
    wash = ports(white(), SLOSH_SPECTRUM, WATER_LIKENESS)
    large = bubbles(low_hz=140, high_hz=356, cycles=3.4, glide=0.044, spread_db=3.2, count=500)
    return level * (gain_of(-5.5) * wash + gain_of(-7.5) * large)


DRIP_DB, DRIP_FADE_DB_PER_S = -46, 20


def trickle(patter_db=-2):
    """Separate drops plink (bubbles) and pat (impacts) into the pond as the wash dies down."""
    ashore_s = TIME - ASHORE_S
    fade = gain_of(DRIP_DB - DRIP_FADE_DB_PER_S * np.maximum(ashore_s, 0))
    level = np.clip(ashore_s / SETTLE_S, 0, 1) * fade
    plinks = bubbles(low_hz=600, high_hz=3400, cycles=4, glide=.015, spread_db=3.5, count=650)
    pat_spectrum = [(500, -25), (1500, 0), (3000, 0), (6000, -14), (16000, -28)]  # (Hz, dB)
    pats = ports(patter(per_s=90, spread_db=2, smooth=0), pat_spectrum, WATER_LIKENESS)
    return level * (plinks + gain_of(patter_db) * pats)


# clots or jets of thrown water: (time [s], level [dB], centre [Hz], rise [s])
WATER_SMACKS = [(.439, -37, 1970, 0.0014), (.604, -38, 2380, 0.0016), (.654, -30, 750, 0.0039),
                (.8, -23.5, 2200, .0005), (.8025, -20, 1110, 0.0024), (.8115, -23, 1500, .001),
                (.9197, -24.5, 3720, .0012), (.932, -22.5, 935, 0.0032), (1.005, -30, 550, 0.0027),
                (1.007, -27, 12800, .002), (1.0895, -17, 1200, .001), (1.106, -27, 2670, 0.0012),
                (1.123, -26, 2160, 0.0039), (1.143, -28.5, 1300, 0.0024), (1.288, -27, 3900, 0.003),
                (1.306, -25.5, 1190, 0.0018), (1.459, -28, 2000, 0.0021), (1.577, -26, 1000, 0.0035),
                (1.578, -19.5, 2040, .003), (1.626, -22.5, 1670, 0.0016), (1.767, -22, 1930, 0.0021),
                (1.782, -23.5, 1700, 0.003), (1.815, -31, 1510, 0.0034), (2.031, -31, 2200, 0.0012),
                (2.08, -33, 2300, .002), (2.154, -29, 1900, 0.0033), (2.258, -39.5, 970, .003),
                (2.33, -27.5, 3670, 0.0026), (2.357, -28.5, 3600, 0.0034), (2.5, -25, 2000, 0.00084),
                (2.531, -24, 1579, 0.0018), (2.548, -33.5, 1870, .003), (2.636, -35, 800, .001),
                (2.701, -34, 2200, .002), (2.76, -35.5, 1700, .002), (2.8735, -23.5, 1970, 0.002),
                (2.933, -26.5, 2100, 0.0023), (3.1022, -20, 1310, 0.0021), (3.188, -28.5, 1400, 0.0077),
                (3.282, -39, 1200, .001), (3.298, -31, 1800, 0.0035), (3.328, -28, 1200, 0.0023),
                (3.378, -22, 1300, 0.0011), (3.458, -33.5, 700, 0.0035), (3.566, -29, 475, 0.0031),
                (3.74, -43, 990, 0.014)]
SMACK_OCTAVES = 0.86  # bandwidth


def smacks():
    """Clots and jets of thrown water smack the surface as band-limited impact clusters."""
    return spatter(WATER_SMACKS, SMACK_OCTAVES, per_s=2000, smooth=0.36)


# relative spectrum of the crack: (frequency [Hz], level [dB])
SLAP_SPECTRUM = [(150, -12), (500, 10), (1200, -5), (2200, 1.5), (3200, -14), (7000, -15.5), (9500, -26.5),
                 (12000, -22.5), (16000, -26)]


def slaps(rise_s=0.00078, shock_s=0.00018, shock_db=4, crack_db=1.5):
    """The sole meets the surface with a sharp shock and cracks the water aside."""
    shock, u = np.zeros(N), np.arange(0, .005, 1 / SR) / shock_s
    for s, _, hz, _, db, *_ in HOOF_PLUNGES:
        # a quarter of a pocket cycle after the strike
        add(shock, s + 1 / (4 * hz), gain_of(db + shock_db) * (1 - u) * np.exp(-u))
    shock = filtered(shock, 1, 3500)
    crack = ports(white(), SLAP_SPECTRUM, [(500, 0.94), (2000, 1.0), (8000, 0.64)])
    crack = puffs(crack, [(s, db + crack_db, rise_s) for s, _, _, _, db, *_ in HOOF_PLUNGES])
    return filtered(shock + crack, 1, 160, "high")


# big bubbles closing behind a leg: (time [s], peak level [dB], pitch [Hz], rise [s], glide [octaves/s])
BIG_GULPS = [(0.495, -36, 179, 0.028, -3), (.537, -30, 115, 0.0069, -0.5), (.647, -26, 408, 0.0093, 0),
             (.675, -31, 170, 0.01, -1), (.838, -23, 330, .0035, -17), (.921, -16, 238, 0.0024, -30),
             (1.004, -29.5, 176, .0055, 1.5), (1.024, -25, 337, 0.015, -1.5),
             (1.092, -27.5, 162, 0.025, -1.5), (1.305, -23.5, 1284, 0.0078, -14),
             (1.605, -24, 213, 0.0079, -2.5), (1.655, -25, 680, 0.0067, -10),
             (1.677, -24.5, 560, 0.0072, -11.5), (1.915, -34, 467, 0.0064, 11), (2.036, -32, 502, 0.006, 9),
             (2.122, -23.5, 234, .004, -11), (2.256, -24.5, 444, 0.0057, -29.5),
             (2.344, -32, 945, 0.0035, 5), (2.365, -25, 364, 0.0092, -13.5), (2.41, -29, 1300, .0025, -8),
             (2.595, -35.5, 613, 0.014, -1), (2.631, -28, 198, .0087, -5.5), (2.795, -28.5, 638, 0.01, -7),
             (2.808, -23.5, 348, 0.0051, -10.5), (2.955, -28.5, 292, 0.0089, -13),
             (3.081, -24.5, 430, 0.0036, 3), (3.105, -29, 160, 0.012, 8), (3.384, -19, 122, 0.0051, -11)]


def pockets(leak_hz=60, sag=0.058):
    """Each hoof drives air under: one or two heavy swings sinking in pitch; big gliding bubbles follow."""
    out, t = np.zeros(N), np.arange(0, .2, 1 / SR)
    for s, db, hz, cycles, *_ in HOOF_PLUNGES:
        add(out, s, gain_of(db) * sagging_swing(t, hz, cycles / hz, sag))
    for s, db, hz, rise_s, glide in BIG_GULPS:
        turns = np.cumsum(hz * 2 ** (glide * t)) / SR
        add(out, s, gain_of(db) * swell(t, rise_s) * np.sin(2 * np.pi * turns))
    return filtered(out, 2, leak_hz, "high")  # open water radiates no deep bass


def banks(x, t60_s=0.39, wet_db=-23):
    """Banks and trees scatter a faint, dull tail: decaying lowpassed noise as the echo response."""
    t = np.arange(0, .6, 1 / SR)
    tail = rng.standard_normal((2, len(t))) * gain_of(-60 * t / t60_s) * (t > .012)
    tail = filtered(tail, 1, 2500)
    tail /= np.linalg.norm(tail[0])
    return gain_of(wet_db) * signal.fftconvolve(x.mean(0)[None], tail, axes=1)[:, :N]


def shading(pair, lean=0.13, low_hz=900, high_hz=2800):
    """The right port hears the middle of the spectrum a little more strongly than the left."""
    middle = filtered(pair, 1, [low_hz, high_hz], "band")
    return pair + np.array([[-lean], [lean]]) * middle


# the horse to the left of the microphone: (time [s], right port lag [ms])
RIGHT_LAG = [(0, 0), (1, 0.063), (1.8, 0.055), (2.3, 0.062), (2.8, 0.11), (3.3, 0.14), (3.8, 0.2),
             (4.3, 0.21), (4.7, 0.059), (8.6, 0.014)]


def scene():
    """The horse, heard later by the port that faces away from it, in the open field."""
    water = churn() + spray() + slosh() + trickle() + smacks()
    horse = turf() + water + slaps() + pockets()
    lag_samples = np.interp(TIME, *np.transpose(RIGHT_LAG)) * SR / 1000
    right = map_coordinates(horse[1], [np.arange(N) - lag_samples], order=5)
    horse = np.array([horse[0], right])
    return outdoors() + bird() + scuffs() + banks(horse) + shading(horse)


EDGE_HZ = 16000


def record(dry):
    """Clips peaks at full scale, then limits the band."""
    lowpass = signal.firwin(511, EDGE_HZ, window=("kaiser", 9), fs=SR)
    return signal.oaconvolve(np.clip(dry, -1, 1), lowpass[None], "same")


dry = scene()
out = record(dry)
bounce(out)
```